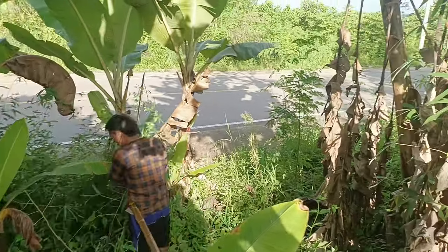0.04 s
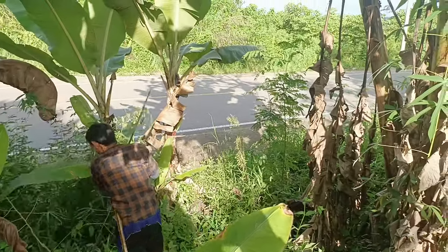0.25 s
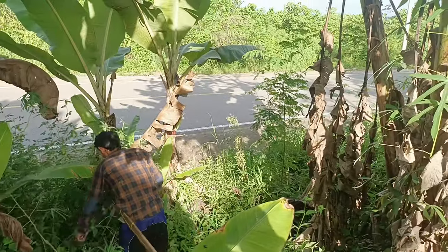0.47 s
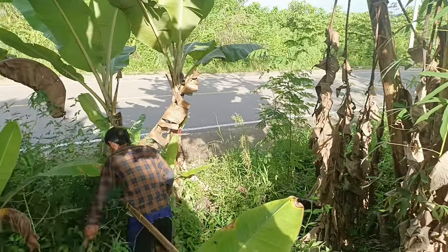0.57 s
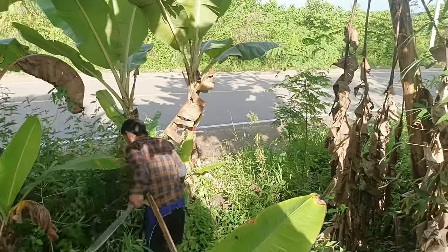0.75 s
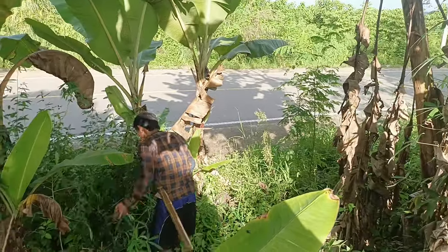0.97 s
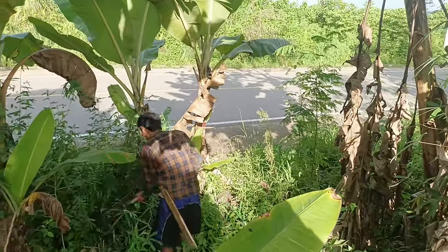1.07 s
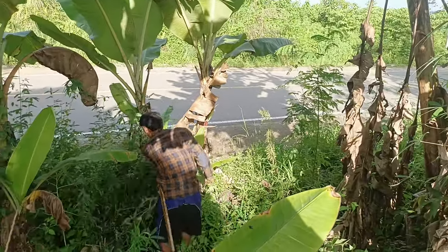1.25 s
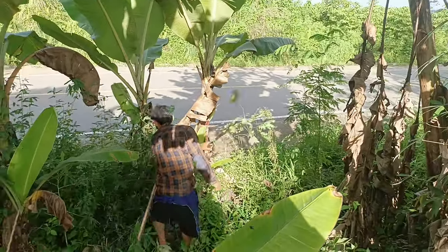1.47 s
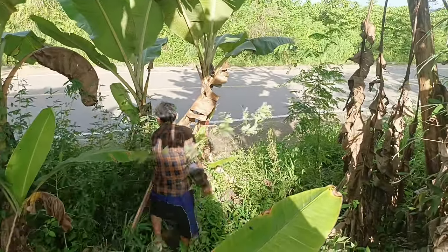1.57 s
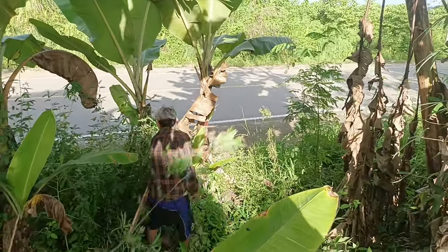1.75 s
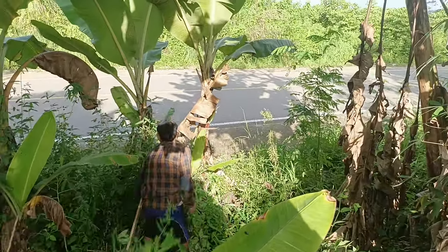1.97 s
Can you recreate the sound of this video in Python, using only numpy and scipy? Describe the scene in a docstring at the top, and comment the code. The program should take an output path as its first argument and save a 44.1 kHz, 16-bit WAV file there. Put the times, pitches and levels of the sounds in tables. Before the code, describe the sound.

Machete chops tear green undergrowth in uneven strokes, crackling and swishing over faint insect hiss outdoors

```python
"""A machete hacks at grass and soft stems a few metres off, beside a quiet road.
Over insect hiss and far traffic drone, stems tear, stalks snap and a chip ticks at the right (0.13 s).
A stronger chop at 0.45 s gives way to a breathy whirr; more chops follow at 1.16, 1.7 and 1.92 s.
Clicks set rings going for plants, snaps and thuds; filtered noise makes leafy air, insects and drone.
Of two microphone ports, the right hears near sounds first; the left rings near 3 kHz and hisses more."""
import sys
import numpy as np
from scipy import signal
from scipy.fft import rfft, irfft
from scipy.io import wavfile
from scipy.ndimage import map_coordinates

SR = 44100
rng = np.random.default_rng(int(sys.argv[2]) if len(sys.argv) > 2 else 0)


def inscribe(sig):
    """Save sig as 16-bit PCM at rate SR to the path in sys.argv[1].

    A 1-D sig is mono; a 2-D sig holds one channel per row.
    Samples are clipped to [-1, 1] before scaling.
    """
    pcm = np.round(np.clip(np.atleast_2d(sig).T, -1, 1) * 32767)
    wavfile.write(sys.argv[1], SR, pcm.astype(np.int16))


N = 88905  # length in samples, about 2 s
TIME_S = np.arange(N) / SR
LEFT_RIGHT = np.array([[1], [-1]])  # plus for left, minus for right


def from_db(db):
    """Turns decibels into an amplitude factor."""
    return 10 ** (np.asarray(db) / 20)


def rms_one(x):
    """Scales a sound to an overall rms of 1."""
    return x / np.sqrt(np.mean(x ** 2) + 1e-20)


def in_time(rows):
    """Joins the table's points by straight lines, giving one smooth track per column."""
    start_s, *columns = np.transpose(rows)
    return [np.interp(TIME_S, start_s, column) for column in columns]


def at_hz(points, hz):
    """Reads a (pitch, value) table at any pitch, along a logarithmic pitch scale."""
    pitch_hz, values = np.array(points).T
    return np.interp(np.log(hz), np.log(pitch_hz), values)


def drift(per_s):
    """Slow random wandering around 0, with a spread of about 1."""
    knots = rng.standard_normal(int(N / SR * 40) + 2)
    return map_coordinates(knots, [TIME_S * min(per_s, 39)], order=3)


def ring(clicks, hz, t60):
    """A unit click starts a sine of height 1 that falls 60 dB in t60 seconds."""
    shrink = from_db(-60 / (t60 * SR))  # per sample
    turn = 2 * np.pi * hz / SR
    return signal.lfilter([0, np.sin(turn)], [1, -2 * shrink * np.cos(turn), shrink ** 2], clicks + 1e-18)


def place(a, b, hz):
    """Mixes two unrelated signals into left and right, as alike and as balanced as their pitch asks."""
    # how alike the two ports sound: pitch_hz [Hz], likeness [0 to 1]
    port_likeness = [(100, 0.96), (400, 0.78), (1500, 0.25), (3000, 0.22), (7000, 0.13), (14000, 0.13)]
    # how much louder the left port is: pitch_hz [Hz], left_over_right_db [dB]
    port_balance = [(100, 3), (500, 2), (1200, -4.5), (2700, 16.5), (6000, -2), (14000, 7.5)]
    alike = np.clip(at_hz(port_likeness, hz), 0, 1)
    shared = np.sqrt(1 + alike) * a
    opposed = np.sqrt(1 - alike) * b * LEFT_RIGHT
    return (shared + opposed) * from_db(at_hz(port_balance, hz) / 2 * LEFT_RIGHT) / np.sqrt(2)


def colour(x, spectrum):
    """Shapes a pair of white noises to a spectrum and places them; rms 1."""
    hz = np.maximum(np.fft.rfftfreq(N, 1 / SR), 10)
    a, b = rfft(x)
    return rms_one(irfft(place(a, b, hz) * from_db(at_hz(spectrum, hz)), N))


def grains(per_s, spread_db, cycles, spectrum, count):
    """Random uneven clicks, shared among short resonances that swell and fade in patches; rms 1."""
    patch_db, patch_per_s, soft_cycles = 2, 9, 10.5
    sizes = from_db(spread_db * np.minimum(rng.exponential(1, (2, N)), 4))
    sizes *= rng.choice([-1, 1], (2, N))
    sizes *= rng.random((2, N)) < per_s / SR  # leaves a click only now and then
    dealt = rng.integers(0, count, (2, N))
    out = 0
    # the outermost spectrum points only set its edges
    for k, hz in enumerate(np.geomspace(spectrum[1][0], spectrum[-2][0], count)):
        sharp = ring(sizes * (dealt == k), hz, cycles / hz)
        a, b = rms_one(ring(sharp, hz, soft_cycles / hz))  # the second ring softens the start
        level_db = at_hz(spectrum, hz) + patch_db * drift(patch_per_s)
        out = out + place(a, b, hz) * from_db(level_db) * np.sqrt(hz)  # higher bands are wider
    return rms_one(out)


def hum(hz, width_hz):
    """Noise sent twice through one resonance, heard as a breathy tone or hiss; rms 1."""
    shrink = np.exp(-np.pi * width_hz / SR)
    x = rng.standard_normal((2, N))
    for _ in range(2):
        x = signal.lfilter([1, 0, -1], [1, -2 * shrink * np.cos(2 * np.pi * hz / SR), shrink ** 2], x)
    return rms_one(place(*x, hz))


def blow(s, db, hz, t60, pan_db, contact_s):
    """A soft push and release sets one decaying ring going; a positive pan leans left."""
    out, start = np.zeros((2, N)), int(s * SR)
    push = np.diff(np.hanning(int(contact_s * SR) + 3))  # at least three points long
    wave = ring(np.r_[push, np.zeros(2000)], hz, t60)[:N - start]
    wave = wave / np.abs(wave).max()
    out[:, start:start + len(wave)] = wave * from_db(db + pan_db / 2 * LEFT_RIGHT)
    return out


def rustle():
    """Stems tear in ringing grains, thick stalks crunch lower, grass blades and leaves flick finely."""
    # cutting and sweeping, as groups of rows, levels before the trims below:
    # start_s [s], stems_db [dB], leaves_db [dB], stalks_db [dB], blades_db [dB]
    cutting = [
        [(0.0, -75, -86, -104, -89), (0.036, -72, -87, -66, -102), (0.048, -63.5, -83, -95, -89),
         (0.056, -56.5, -74, -82, -83), (0.064, -44.5, -68, -74, -69), (0.076, -47, -62, -54, -55),
         (0.092, -53, -66, -58.5, -64), (0.118, -57, -82, -60, -70), (0.122, -59, -72, -57, -72),
         (0.128, -49, -76, -61, -54), (0.136, -60, -59, -69, -71), (0.172, -66.5, -72, -70, -76),
         (0.2, -69, -71, -61, -74)],
        [(0.2, -66, -69, -70, -70), (0.206, -63, -68, -63, -79), (0.218, -68, -79, -53.5, -68),
         (0.262, -64, -59, -66.5, -59.5), (0.292, -70, -73, -73, -67), (0.322, -65, -82, -68, -73),
         (0.334, -69, -88, -79, -72), (0.342, -66, -67, -65, -69), (0.352, -62, -53.5, -79, -58.5),
         (0.37, -60, -65, -89, -61), (0.38, -47.5, -58, -72, -60), (0.392, -56, -67, -79, -53),
         (0.4, -51, -59, -76, -57), (0.41, -57, -62, -76, -58), (0.415, -63, -59, -81, -55)],
        [(0.415, -63, -52, -75, -42.5), (0.427, -54, -47, -80, -51), (0.439, -59.5, -58, -67, -53.5),
         (0.445, -44.5, -50, -58, -43), (0.457, -38, -49.5, -36, -42.5), (0.489, -49, -53, -61, -52.5),
         (0.505, -54, -53, -54.5, -53), (0.547, -49, -53.5, -50, -51.5), (0.575, -52, -59, -56.5, -56),
         (0.62, -53.5, -63, -56.5, -58.5)],
        [(0.62, -56, -62, -70, -59), (0.638, -55.5, -63, -50.5, -58), (0.754, -62.5, -70, -60.5, -65.5),
         (0.78, -61, -75, -63, -69), (0.81, -73, -70, -69, -72), (0.82, -63, -87, -61, -82),
         (0.848, -60.5, -63, -64, -64), (0.868, -71, -84, -62, -86), (0.892, -78, -86, -81, -67.5),
         (0.934, -87, -95, -83, -72), (0.952, -76, -79, -92, -68), (0.994, -97, -91, -101, -88),
         (1.022, -82, -90, -73, -73), (1.05, -87, -88, -83, -92), (1.058, -72, -69, -78, -66)],
        [(1.058, -67.5, -62, -76, -53.5), (1.112, -52, -53.5, -74, -53), (1.152, -52.5, -58, -61.5, -55),
         (1.166, -37.5, -50, -41, -44), (1.204, -57, -62, -79, -60), (1.256, -62.5, -61, -77, -60),
         (1.278, -60, -61, -58, -62), (1.308, -57.5, -68, -67, -74), (1.382, -83.5, -77, -75.5, -73),
         (1.436, -67.5, -68, -83, -88), (1.49, -79, -97, -72, -87), (1.502, -60, -75, -73, -89),
         (1.516, -73, -68, -77, -68), (1.532, -77, -102, -81, -77), (1.6, -72, -75, -62, -63)],
        [(1.6, -65, -73, -60, -59), (1.614, -56, -76, -67, -60), (1.65, -58.5, -64, -53, -61.5),
         (1.662, -49.5, -63, -43.5, -58), (1.684, -43, -55.5, -45.5, -54), (1.694, -43.5, -58, -43, -54.5),
         (1.716, -44.5, -56, -50, -46), (1.726, -40, -55, -44.5, -51), (1.74, -40.5, -54, -47.5, -48.5),
         (1.756, -46, -57.5, -51, -52.5), (1.796, -46, -56, -47, -53.5), (1.81, -46, -53, -44, -48.5),
         (1.858, -60.5, -61.5, -62, -60.5), (1.902, -82, -69, -79, -75), (1.91, -67, -73, -63, -76)],
        [(1.91, -59, -71, -73, -80), (1.916, -44, -53, -47, -46.5), (1.926, -42.5, -52, -52, -42.5),
         (1.96, -48.5, -51.5, -60, -46), (1.974, -52, -54, -58, -52.5), (2.016, -56, -56, -61, -53.5)],
    ]
    # tone of tearing stems: pitch_hz [Hz], relative_density_db [dB per Hz]
    stem_tone = [(820, -36), (1400, -2), (1530, -9), (1950, -5), (2700, -3.5), (2930, -3), (4200, -10),
                 (5460, -86), (9240, -120)]
    # tone of crunching thick stalks: pitch_hz [Hz], relative_density_db [dB per Hz]
    stalk_tone = [(210, -36), (350, 2.5), (405, -7), (723, 0), (1600, 4.5), (2080, -54), (3520, -120)]
    # tone of swishing leaves: pitch_hz [Hz], relative_density_db [dB per Hz]
    leaf_tone = [(5060, -39), (8600, -4), (12300, -6), (15200, 6), (16200, -27.5), (16500, -43)]
    # tone of swishing grass blades: pitch_hz [Hz], relative_density_db [dB per Hz]
    blade_tone = [(2350, -33), (4000, -6.5), (7190, -1.5), (8200, -2), (8600, -29), (11200, -28),
                  (18900, -120)]
    tear_trim_db, crunch_trim_db, flick_trim_db = 3, 0, 4
    stems_db, leaves_db, stalks_db, blades_db = in_time(np.concatenate(cutting))
    stems = grains(per_s=6000, spread_db=2, cycles=29.5, spectrum=stem_tone, count=20)
    stalks = grains(per_s=1500, spread_db=2, cycles=7.9, spectrum=stalk_tone, count=8)
    leaves = grains(per_s=10000, spread_db=2.5, cycles=4, spectrum=leaf_tone, count=8)
    blades = grains(per_s=10000, spread_db=2.5, cycles=4, spectrum=blade_tone, count=8)
    out = from_db(stems_db + tear_trim_db) * stems
    out += from_db(stalks_db + crunch_trim_db) * stalks
    out += from_db(leaves_db + flick_trim_db) * leaves
    out += from_db(blades_db + flick_trim_db) * blades
    return out


def snaps():
    """Each single stalk snaps with two short rings, softened above 4200 Hz."""
    # snapping stalks, peaks before filtering: start_s [s], peak_db [dB], pitch_hz [Hz],
    # low_pitch_hz [Hz], low_level_db [dB against the main ring], t60_s [s], left_over_right_db [dB]
    stalk_snaps = [(0.065, -31, 2635, 1360, -42, 0.018, 23), (0.072, -41, 2230, 1710, -10, 0.024, 24),
                   (0.078, -33, 2460, 1560, -15, 0.023, 12), (0.084, -36, 2780, 1370, -6.5, 0.036, 5.5),
                   (0.379, -34.5, 2660, 1330, -17, 0.019, 13), (0.396, -41, 3070, 1660, -12, 0.014, 6.0),
                   (0.443, -36, 3440, 872, -3.5, 0.036, -6), (0.449, -35, 1810, 1410, 4, 0.015, -2),
                   (0.457, -26, 2470, 870, -5, 0.036, 1), (0.64, -41, 1750, 1135, 2, 0.02, -9),
                   (0.666, -41, 1830, 764, 9, 0.0075, 4.5), (0.822, -39.5, 2210, 1650, -7, 0.021, 12),
                   (1.107, -34, 3080, 1680, -25, 0.011, 10), (1.161, -26.5, 3000, 1650, -14, 0.0062, -2),
                   (1.166, -46, 3000, 1700, -25, 0.018, -2), (1.659, -53, 1780, 1740, -10, 0.012, -3),
                   (1.661, -28.5, 1995, 1390, -3.5, 0.036, 5.5), (1.672, -35.5, 2970, 1640, -20, 0.036, 18),
                   (1.724, -22, 2880, 1250, -11, 0.0081, 2), (1.728, -28.5, 2260, 1370, -26, 0.01, 10),
                   (1.735, -31, 2900, 1240, -18, 0.01, 14), (1.779, -32, 2120, 1210, -7, 0.0084, 1),
                   (1.804, -25, 2900, 745, -13, 0.0084, 7.5)]
    contact_s = 0.00015
    out = np.zeros((2, N))
    for s, db, hz, low_hz, low_db, t60, pan_db in stalk_snaps:
        out += blow(s, db, hz, t60, pan_db, contact_s)
        out += blow(s, db + low_db, low_hz, t60, pan_db / 2, contact_s)
    return signal.sosfilt(signal.butter(3, 4200, fs=SR, output="sos"), out)


def thuds():
    """Blade and feet thud on the soil: a dull ring of a few cycles with a higher knock."""
    # thuds, peaks before filtering: start_s [s], peak_db [dB], pitch_hz [Hz],
    # ring_length [cycles to fall 60 dB], knock_level_db [dB against the dull ring]
    soil_thuds = [(0.022, -39, 117, 8.1, -19), (0.029, -37.5, 134, 1.06, -4.5),
                  (0.066, -38.5, 135, 4.5, -25), (0.114, -43, 134, 2.1, -7), (0.121, -42.5, 130, 2.2, -6),
                  (0.172, -54, 135, 6.1, -19), (0.215, -47, 348, 5.7, -26), (0.221, -42.5, 134, 2.3, -20),
                  (0.241, -51, 110, 4.4, -1), (0.45, -52.5, 365, 1.6, 1), (0.531, -43.5, 173, 7.6, -21),
                  (0.64, -39.5, 317, 7.6, -33), (0.666, -34.5, 210, 1.4, -27), (1.159, -40, 365, 3.9, -15),
                  (1.261, -54.5, 224, 9, -13), (1.296, -51, 366, 9, -12), (1.668, -38, 436, 4.7, -10),
                  (1.68, -34.5, 318, 2.6, -13)]
    contact_s, knock_hz, knock_t60_s = 0.0016, 533, 0.017
    out = np.zeros((2, N))
    for s, db, hz, cycles, knock_db in soil_thuds:
        out += blow(s, db, hz, cycles / hz, 2.0, contact_s)
        out += blow(s, db + knock_db, knock_hz, knock_t60_s, 1.5, contact_s)
    return out


TICK_S = 0.12685  # when the chip hits


def tick():
    """A chip hits next to the right port: two very short high rings."""
    t60_s, pan_db = 0.00098, -21
    high = blow(TICK_S, -14.5, 13800, t60_s, pan_db, 0)
    low = blow(TICK_S, -25.5, 6800, t60_s, pan_db, 0)
    return high + low


def spray():
    """A bright burst of noise follows the tick and dies away at once."""
    level_db, t60_s = -40, 0.02  # level before the noise is brightened
    after_s = TIME_S - TICK_S
    fade = from_db(level_db - 60 * np.abs(after_s) / t60_s) * (after_s > 0)
    bright_noise = np.diff(rng.standard_normal((2, N + 1)))
    return fade * bright_noise


def hits():
    """Snaps, thuds and tick lose their deepest bass; the spray is added."""
    no_bass = signal.butter(2, 96, "high", fs=SR, output="sos")
    return signal.sosfilt(no_bass, snaps() + thuds() + tick()) + spray()


def whirr():
    """A breathy whirr: noise through a resonance at 1745 Hz, rising and falling in level."""
    # whirr: start_s [s], level_db [dB]
    whirr_level = [(0.55, -75), (0.592, -63), (0.612, -54.5), (0.79, -50), (0.806, -54), (0.834, -47),
                   (0.902, -56), (0.915, -49.5), (0.942, -57.5), (1.012, -55.5), (1.024, -60.5),
                   (1.12, -59.5)]
    before = (whirr_level[0][0] - 0.05, -90)
    after = (whirr_level[-1][0] + 0.04, -90)
    level_db, = in_time([before, *whirr_level, after])
    return from_db(level_db) * hum(1745, width_hz=175)


def warbles():
    """Brief breathy tones of narrow noise; each swells and fades as half a sine."""
    # breathy tones: start_s [s], length_s [s], pitch_hz [Hz], level_db [dB at the height of the swell]
    breathy_tones = [(0.01, 0.041, 1680, -67.5), (0.21, 0.14, 1630, -62.5), (0.329, 0.059, 1312, -57.5),
                     (0.747, 0.087, 436, -60.5), (0.857, 0.4, 900, -69), (0.926, 0.19, 417, -65),
                     (0.935, 0.13, 3690, -67.5), (1.009, 0.028, 1310, -57.5), (1.258, 0.096, 2077, -63),
                     (1.273, 0.35, 820, -77.5), (1.506, 0.12, 2920, -70.5), (.22, 0.044, 3810, -63.5),
                     (1.433, 0.016, 2270, -73)]
    out = np.zeros((2, N))
    for s, length_s, hz, db in breathy_tones:
        swell = np.sin(np.pi * np.clip((TIME_S - s) / length_s, 0, 1))
        out += from_db(db) * swell * hum(hz, width_hz=80)
    return out


def insects():
    """Insects hiss: a steady wide band of noise near 7620 Hz, cut steeply above 8340 Hz."""
    top_cut = signal.butter(8, 8340, fs=SR, output="sos")
    return from_db(-58) * signal.sosfilt(top_cut, hum(7620, width_hz=1780))


def drone():
    """Far traffic drones: four low bands of noise, each changing in level."""
    # drone: start_s [s], then level_db [dB] of each of the four bands
    band_levels = [(0.0, -73, -66, -57.5, -58), (0.06, -61, -78, -64.5, -62), (0.1, -74, -65, -95, -73),
                   (0.18, -85, -74, -69, -84), (0.23, -89, -75, -69, -64), (0.34, -86, -102, -101, -96),
                   (0.49, -93, -90, -101, -94), (0.59, -91, -62, -69, -88), (0.65, -87, -64, -81, -60),
                   (0.72, -73, -62, -60.5, -67), (0.82, -76, -71.5, -83, -92), (0.98, -67, -68, -73, -68.5),
                   (1.05, -67, -73, -80, -81), (1.18, -91, -69, -64, -65.5), (1.33, -70, -92, -70, -61),
                   (1.42, -78, -70.5, -64, -65), (1.53, -68, -93, -59.5, -58), (1.63, -58, -64, -60, -59.5),
                   (1.72, -73, -57, -53, -57.5), (1.78, -72, -60, -60.5, -56.5),
                   (1.9, -87, -60.5, -59, -58.5), (2.02, -68, -86, -71, -111)]
    # the four bands: pitch_hz [Hz], width_hz [Hz]
    bands = [(75, 7.2), (108, 21.6), (270, 155), (410, 88)]
    return sum(from_db(db) * hum(hz, width_hz) for db, (hz, width_hz) in zip(in_time(band_levels), bands))


def air():
    """Still air: steady noise shaped to a spectrum."""
    # tone of the air: pitch_hz [Hz], relative_density_db [dB per Hz]
    air_tone = [(350, -38), (600, -17), (2120, -32), (2890, 11.5), (4950, -26), (5500, 35), (6000, -5),
                (7800, -46), (13200, -120)]
    return from_db(-73) * colour(rng.standard_normal((2, N)), air_tone)


def scene():
    """All sources; the left port hears rustle and hits 0.19 ms late."""
    left_lag_s = 0.00019
    left, right = rustle() + hits()
    delay = np.exp(-2j * np.pi * np.fft.rfftfreq(N, 1 / SR) * left_lag_s)
    near = np.array([irfft(rfft(left) * delay, N), right])
    return near + whirr() + warbles() + insects() + drone() + air()


def record(dry):
    """The left port hisses in the treble; both ports dip near 9 kHz; bass and top are cut."""
    # tone of the left port's hiss: pitch_hz [Hz], relative_density_db [dB per Hz]
    hiss_tone = [(8000, -49), (9300, 0), (11000, 2), (13000, -14), (15000, -13), (16500, -13.5)]
    hiss_db = -67.5
    notch_hz, notch_width_hz, notch_db = 8860, 550, -7.5
    hz = np.fft.rfftfreq(N, 1 / SR)
    hiss = rms_one(irfft(rfft(rng.standard_normal(N)) * from_db(at_hz(hiss_tone, hz + 1)), N))
    wet = dry + from_db(hiss_db) * hiss * np.array([[1], [0]])  # left only
    dip = from_db(notch_db * np.exp(-((hz - notch_hz) / notch_width_hz) ** 2))
    wet = irfft(rfft(wet) * dip, N)
    wet = signal.sosfilt(signal.butter(3, 35, "high", fs=SR, output="sos"), wet)
    # 60 dB down from 16900 Hz upward
    return signal.sosfilt(signal.cheby2(14, 60, 16900, fs=SR, output="sos"), wet)


dry = scene()
out = record(dry)
inscribe(out)
```